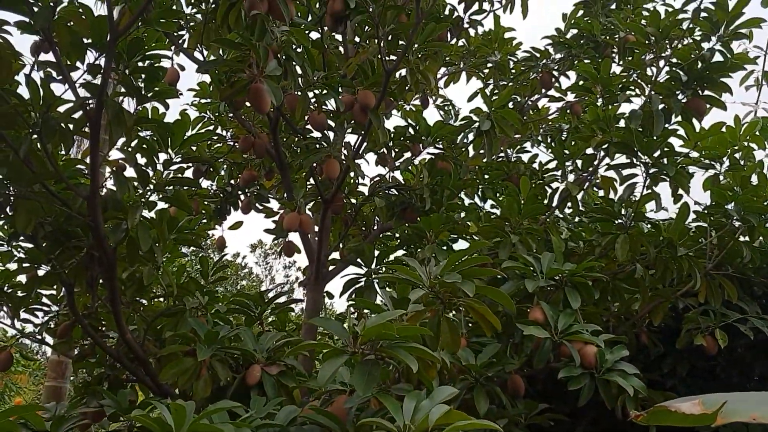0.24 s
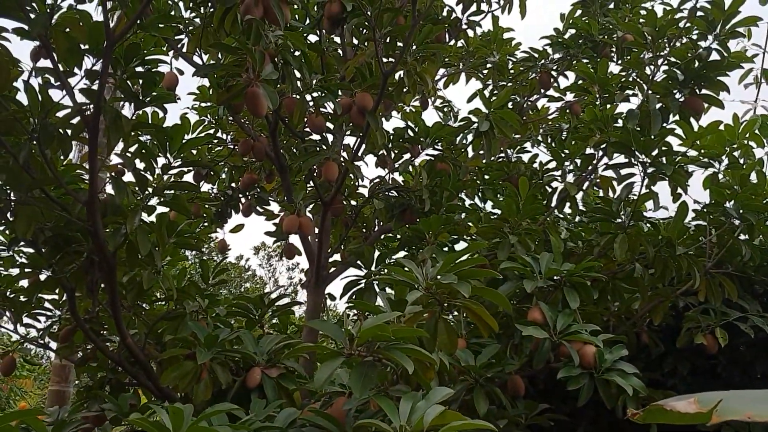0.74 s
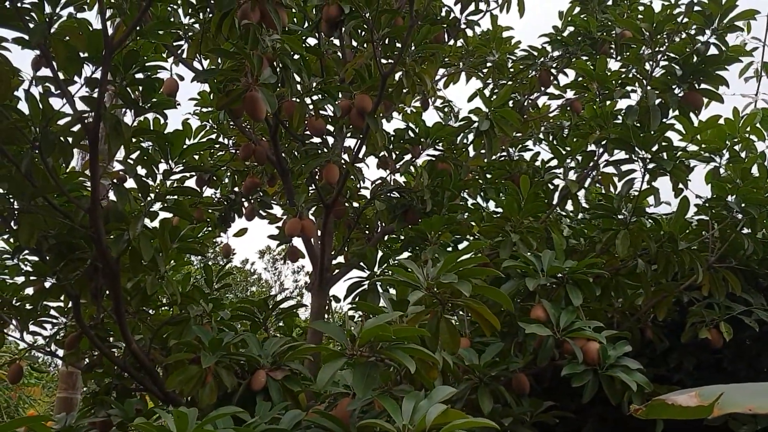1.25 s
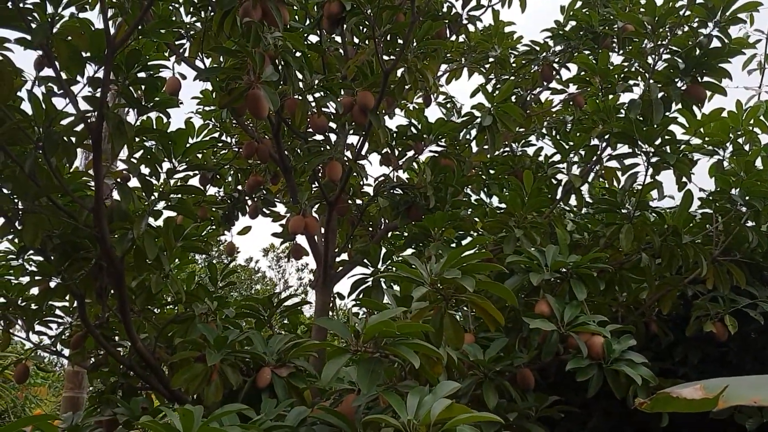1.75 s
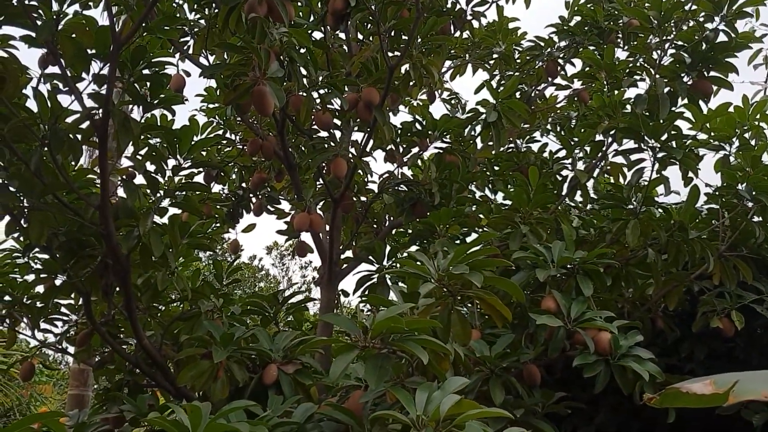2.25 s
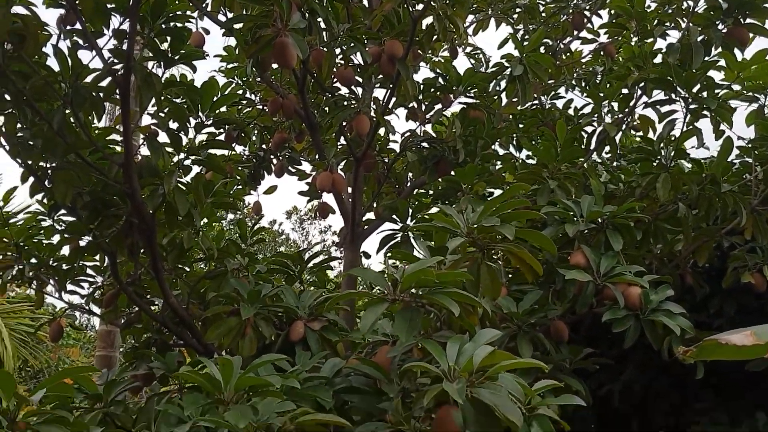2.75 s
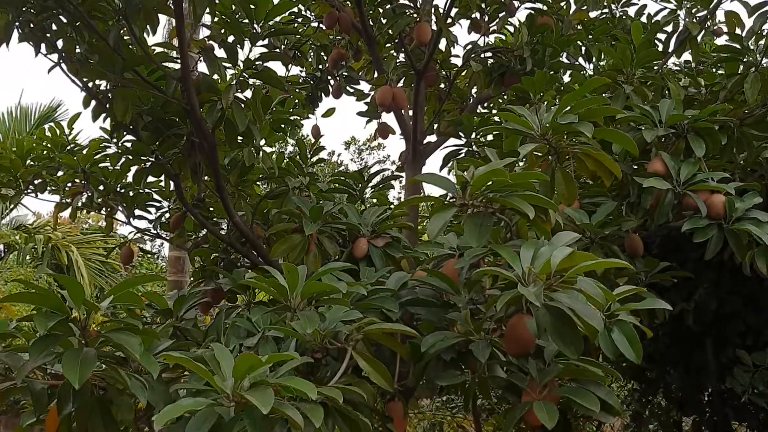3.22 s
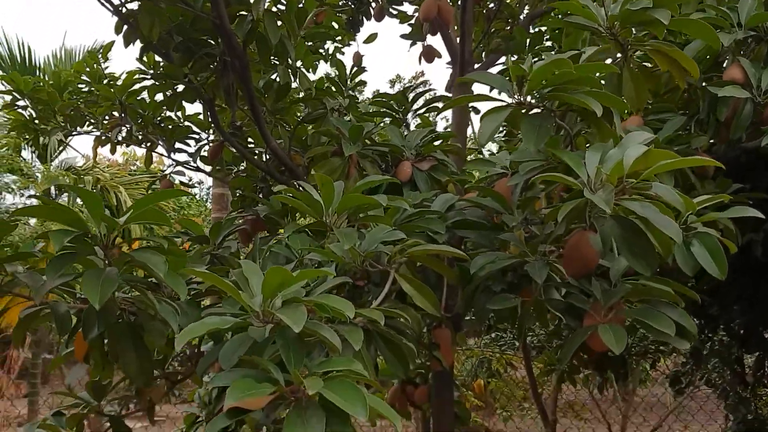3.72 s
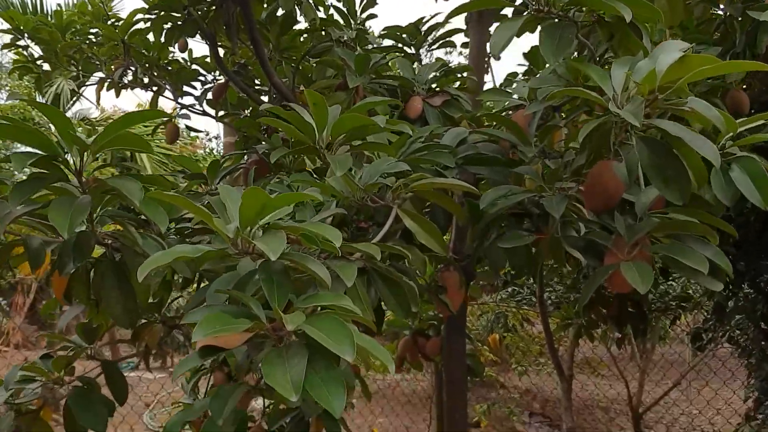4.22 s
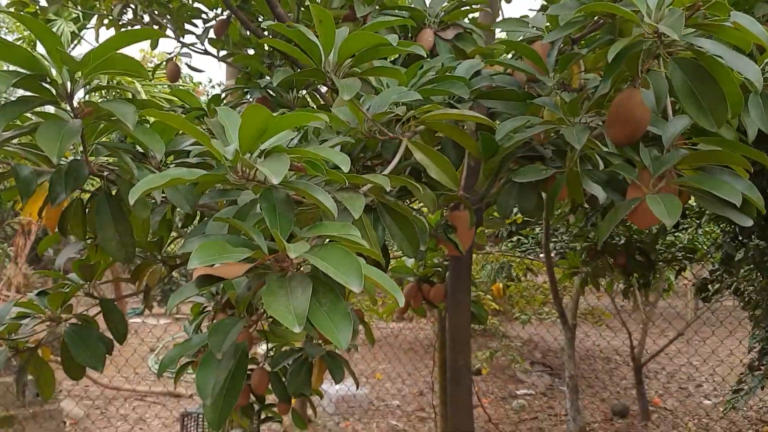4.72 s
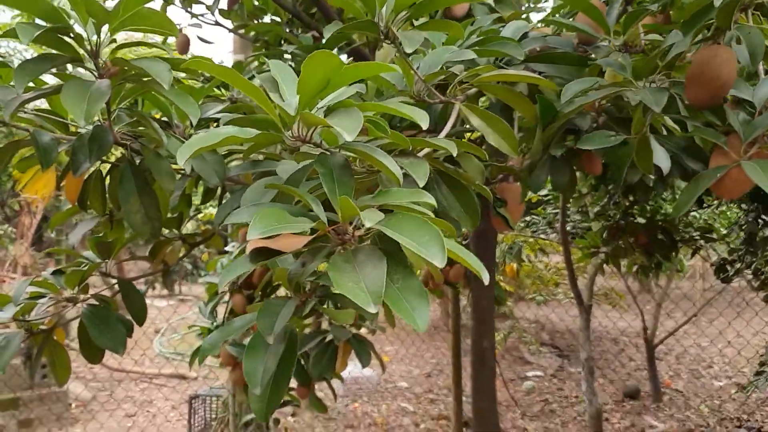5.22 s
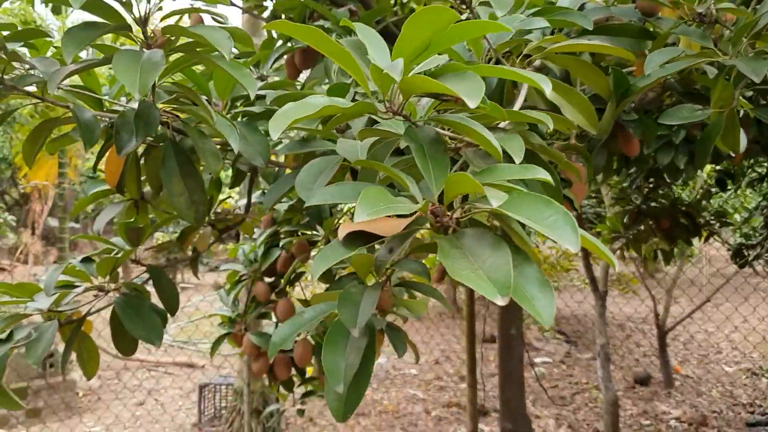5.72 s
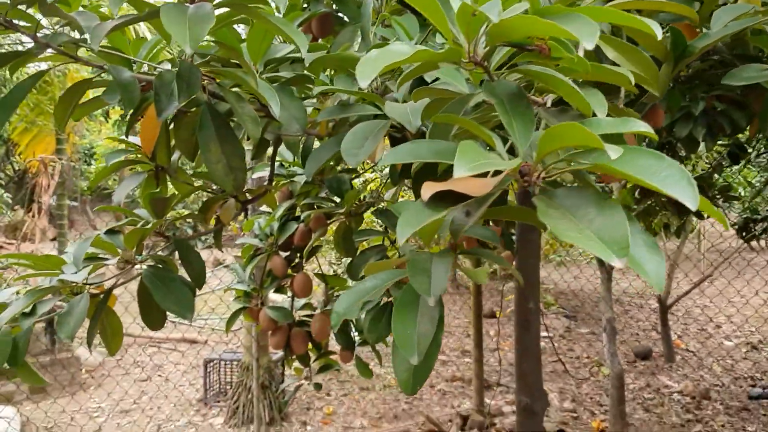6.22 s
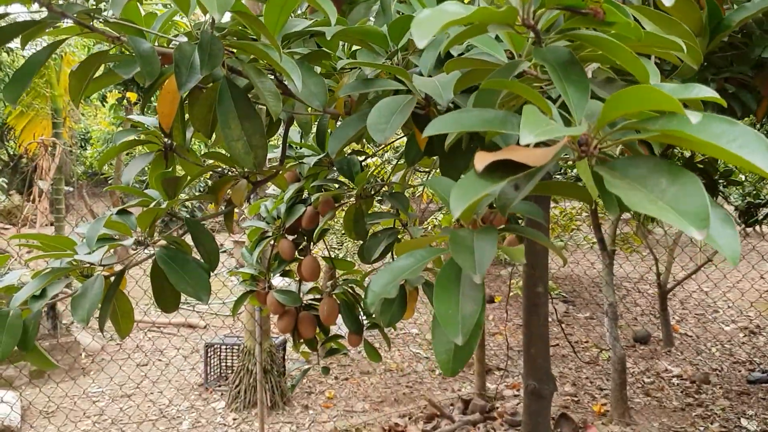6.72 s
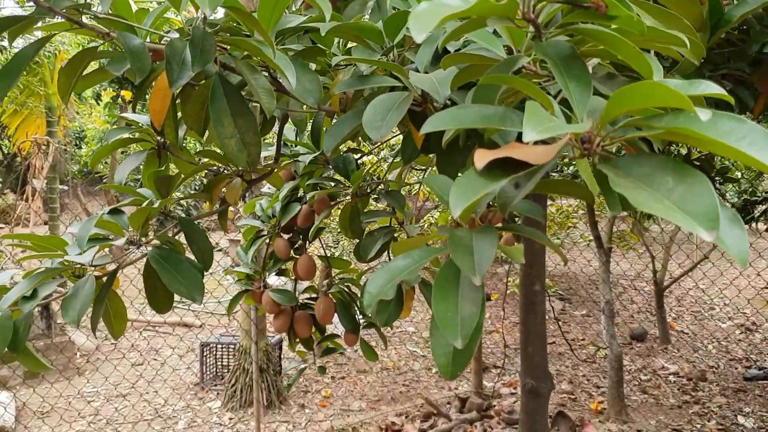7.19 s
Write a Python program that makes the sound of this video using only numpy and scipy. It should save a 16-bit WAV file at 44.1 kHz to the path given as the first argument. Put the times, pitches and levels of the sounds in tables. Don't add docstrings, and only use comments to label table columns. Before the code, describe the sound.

Two hens cluck hoarsely and give drawn-out squawks in an orchard while a songbird repeats a falling whistle over a faint distant pump thump.

```python
import sys
import numpy as np
from scipy import signal
from scipy.fft import rfft, irfft, next_fast_len
from scipy.io import wavfile
from scipy.ndimage import uniform_filter1d

SR = 44100
rng = np.random.default_rng(int(sys.argv[2]) if len(sys.argv) > 2 else 0)


def dump(signal):
    limited = np.clip(np.atleast_2d(signal).T, -1, 1)
    pcm = np.round(limited * 32767).astype(np.int16)
    wavfile.write(sys.argv[1], SR, pcm)


def nominal_scale(level):
    x = np.asarray(level, float) / 20
    return 10 ** x


N = 328711


def shape(hz, points):
    f, db = np.transpose(points)
    return nominal_scale(np.interp(np.log(np.maximum(hz, 1)), np.log(f), db))


def colour(x, points):
    size = next_fast_len(len(x))
    hz = np.arange(size // 2 + 1) * SR / size
    return irfft(rfft(x, size) * shape(hz, points), size)[:len(x)]


def unit(x):
    return x / np.sqrt(np.mean(x ** 2))


def add(out, x, s):
    early, i = max(-int(s * SR), 0), max(int(s * SR), 0)
    out[..., i:i + x.shape[-1] - early] += x[..., early:early + N - i]


def ring(x, hz, width_hz):
    return signal.lfilter(*signal.iirpeak(hz, hz / width_hz, SR), x)


def walk(rate_hz, size=N):
    k = int(SR / rate_hz)
    noise = rng.standard_normal(size + 2 * k)
    return unit(uniform_filter1d(uniform_filter1d(noise, k), k)[k:k + size])


def pulses(hz, jitter, scatter_db, weak):
    cycles = np.cumsum(hz) / SR
    count = int(cycles[-1]) + 2
    chance = rng.standard_normal((count, 2))
    due = np.cumsum(1 + jitter * chance[:, 0]) - 1
    at = np.interp(due, cycles, np.arange(len(hz)), right=len(hz))
    size = nominal_scale(scatter_db * chance[:, 1]) * (1 - weak * (np.arange(count) % 2))
    out, whole = np.zeros(len(hz) + 2), at.astype(int)
    np.add.at(out, whole, size * (1 - at + whole))
    np.add.at(out, whole + 1, size * (at - whole))
    return out[:len(hz)]


def tract(x, modes):
    y = 0
    for k, (hz, width_hz, db) in enumerate(modes):
        y = y + (-1) ** k * nominal_scale(db) * ring(ring(x, hz, width_hz), hz, 1.66 * width_hz)
    return y / abs(y).max()


# (frequency [Hz], level [dB])
AIR_OUTLINE = [(87, -0.5), (195, -27.5), (256, -17.5), (439, -33), (840, -18), (1520, -26.5), (3620, -35),
               (16000, -30)]
AIR_DB = -69


def air():
    noise = np.array([colour(rng.standard_normal(N), AIR_OUTLINE) for _ in range(2)])
    high_pass = signal.butter(2, 150, "high", fs=SR, output="sos")
    return unit(signal.sosfilt(high_pass, noise)) * nominal_scale(AIR_DB + walk(2))


def wind():
    gusts = rng.standard_normal((2, N)) + 0.79 * rng.standard_normal(N)
    band = signal.butter(2, [35, 150], "band", fs=SR, output="sos")
    return unit(signal.sosfilt(band, gusts)) * nominal_scale(np.array([[-59.5], [-57.5]]))


# (time [s], firing rate [1/s])
PUMP_RATE = [(0.0, 14.7), (1.91, 15.7), (2.34, 17.2), (7.45, 17.9)]
# (frequency [Hz], width [Hz], level [dB])
EXHAUST_MODES = [(50.4, 18, -36.5), (89.4, 17, 4.5), (132.3, 7.5, -3.5), (216, 170, -6)]
PUMP_DB = -54.5


def pump():
    rate_hz = np.interp(np.arange(N) / SR, *np.transpose(PUMP_RATE))
    fired = pulses(rate_hz, jitter=.07, scatter_db=2.5, weak=0)
    thump = 0
    for k, (hz, width_hz, db) in enumerate(EXHAUST_MODES):
        thump = thump + (-1) ** k * nominal_scale(db) * unit(ring(ring(fired, hz, width_hz), hz, 3.3 * width_hz))
    thump = signal.sosfilt(signal.butter(4, 280, fs=SR, output="sos"), thump)
    mono = unit(thump) * nominal_scale(PUMP_DB + walk(2))
    return mono * nominal_scale(np.array([[-.8], [.8]]))


# (time [s], level [dB])
BRUSHING = [(3.001, -109), (3.131, -75), (3.2, -62.5), (3.31, -57), (3.38, -64), (4.03, -60), (4.33, -73),
            (4.46, -82), (4.841, -73), (5.64, -81.5), (6.35, -73), (6.5, -62), (6.66, -88.5), (7.019, -103),
            (7.2, -68), (7.45, -64)]
# (frequency [Hz], level [dB])
LEAF_OUTLINE = [(470, -67.5), (800, -19.5), (1850, -11.5), (2290, -10), (3300, -8.5), (4460, -14.5),
                (9940, -14.5), (16000, -15)]


def rustle():
    s, db = np.transpose(BRUSHING)
    grain_db = 6.5 * np.minimum(rng.exponential(size=N), 3.5)
    grains = rng.standard_normal((2, N)) * (1 + (rng.random(N) < .006) * nominal_scale(grain_db))
    hiss = np.array([unit(colour(g, LEAF_OUTLINE)) for g in grains]) * nominal_scale(np.array([[2.5], [-2.5]]))
    brushed_db = np.interp(np.arange(N) / SR, s, db, left=-110)
    return hiss * nominal_scale(brushed_db + 10.5 + 0.6 * walk(26))


# (time [s], level [dB], frequency [Hz], left minus right [dB])
LEAF_TICKS = [(3.3433, -35.5, 10900, -4), (3.6795, -28.5, 14360, 6), (3.7229, -42, 9560, 0),
              (3.7618, -37, 13300, 3.5), (3.8646, -30, 8400, 6), (3.9894, -31.5, 8930, 12),
              (4.0512, -14, 9500, 13.5), (4.142, -26.5, 13480, 2), (4.6992, -42, 8940, -2),
              (4.8534, -39.5, 11500, -4), (5.027, -68, 9600, 0)]
LEAF_TAPS = [
    (4.67, -59, 948, -17),
    (4.964, -42, 810, -1),
    (5.002, -42, 881, 1),
    (5.066, -39, 1940, 6.5),
    (5.199, -56.5, 2100, 3),
    (6.747, -51.5, 904, 4),
]


def ticks_and_taps():
    out, t = np.zeros((2, N)), np.arange(int(0.028 * SR)) / SR
    decay = np.exp(-t / .003) + 0.27 * np.exp(-t / 0.037)
    for events, breadth in ((LEAF_TICKS, .9), (LEAF_TAPS, .75)):
        for s, db, hz, pan_db in events:
            burst = rng.standard_normal((2, len(t))) * decay
            tick = ring(ring(burst, hz, breadth * hz), hz, 1.3 * breadth * hz)
            add(out, tick / abs(tick).max() * nominal_scale(db + np.array([[pan_db], [-pan_db]]) / 2), s)
    return out


# (time [s], level [dB], left minus right [dB])
KNOCKS = [
    (1.518, -14.5, 26),
    (1.627, -23.5, 15),
    (6.906, -56.5, 10),
]


def knocks():
    out, t = np.zeros((2, N)), np.arange(int(0.028 * SR)) / SR
    jolt = np.exp(-t / 0.00083) - 0.41 * np.exp(-t / 0.006) * np.sin(2 * np.pi * 95 * t)
    for s, db, pan_db in KNOCKS:
        add(out, jolt * nominal_scale(db + np.array([[0], [-pan_db]])), s)
    return out


# (frequency [Hz], left minus right [dB])
PORT_SHADE = [(60, -2), (250, 3.5), (1000, 6), (4000, 9), (15000, 8)]
# (delay [s], t60 [s], level [dB], treble edge [Hz])
NEAR_ECHOES = [(.002, 0.37, 2.5, 6170), (0.018, 0.6, -14.5, 4280), (.06, 1.6, -31.5, 2500),
               (.33, 0.33, -41, 2500)]
DISTANT_ECHOES = [(.001, .35, 1.5, 9000), (0.035, 1.092, -8.5, 4690)]
LEFT_LEAD_S = .00037
ECHOES_ALIKE = 0.38


def orchard(x, direct_db, wet_db, echoes=NEAR_ECHOES):
    lead = round(LEFT_LEAD_S * SR)
    lift = [(f, db / 2) for f, db in PORT_SHADE]
    cut = [(f, -db / 2) for f, db in PORT_SHADE]
    direct = nominal_scale(direct_db) * np.array([colour(x, lift), colour(np.roll(x, lead), cut)])
    t, tail = np.arange(int(1.3 * SR)) / SR, 0
    for delay_s, t60_s, db, edge_hz in echoes:
        noise = signal.lfilter(*signal.butter(1, edge_hz, fs=SR), rng.standard_normal((2, len(t))))
        noise[1] = ECHOES_ALIKE * np.roll(noise[0], lead) + np.sqrt(1 - ECHOES_ALIKE ** 2) * noise[1]
        fading = noise * (t > delay_s) * nominal_scale(-60 * t / t60_s)
        tail = tail + nominal_scale(db) * fading / np.sqrt(np.sum(fading ** 2) / 2)
    tail = np.array([tail[0], colour(tail[1], cut)])
    return direct + nominal_scale(wet_db) * signal.fftconvolve(x[None], tail, axes=1)[:, :N]


# (time [s], length [s], start [Hz], end [Hz], level [dB])
FAR_NOTES = [
    (0.609, 0.015, 5220, 2500, -61),
    (2.631, 0.11, 2470, 1973, -59.5),
    (2.757, 0.062, 2210, 2580, -64),
    (2.786, 0.057, 2850, 3190, -76),
    (2.85, 0.058, 2000, 2500, -69),
    (2.919, 0.011, 3280, 2250, -60),
    (3.038, 0.055, 5200, 5943, -64),
    (3.108, 0.055, 5990, 6900, -55),
    (4.58, 0.11, 3370, 2900, -67),
    (5.037, .12, 2700, 2195, -64.5),
]
# (time into it [s], length [s], start [Hz], end [Hz], level [dB])
PHRASE_NOTES = [
    (0, 0.091, 6670, 4755, -61),
    (.097, 0.043, 5100, 6100, -66),
    (.15, .055, 5620, 7300, -69),
]
CHIP_NOTES = [
    (0.0043, 0.016, 6900, 4230, -52),
]
PHRASE_STARTS_S = [.939, 2.635, 5.748]
CHIP_STARTS_S = [2.92, 4.652, 5.305]
FAR_BLUR_HZ = 350


def twitter():
    out, notes = np.zeros(N), list(FAR_NOTES)
    for motif, starts in ((PHRASE_NOTES, PHRASE_STARTS_S), (CHIP_NOTES, CHIP_STARTS_S)):
        notes += [(start + s, *note) for start in starts for s, *note in motif]
    for s, length_s, start_hz, end_hz, db in notes:
        count = int(length_s * SR)
        hz = np.linspace(start_hz, end_hz, count)
        frayed = np.hanning(count) ** 0.069 * (0.37 + walk(FAR_BLUR_HZ, size=count))
        add(out, nominal_scale(db) * frayed * np.sin(2 * np.pi * np.cumsum(hz) / SR), s)
    return out


# (time [s], peak level [dB], start [Hz])
FALLING_WHISTLES = [
    (1.332, -36.5, 6380),
    (2.293, -36.5, 6250),
    (3.58, -36.5, 6030),
    (4.78, -36.5, 6120),
    (5.968, -35.5, 6100),
    (7.107, -34.5, 6110),
]
WHISTLE_END_HZ, WHISTLE_S = 2490, .185


def whistles():
    out, t = np.zeros(N), np.arange(int(WHISTLE_S * SR)) / SR
    fall = 0.67 * np.exp(-(t / 0.029) ** 1.2) + .33 * (1 - t / WHISTLE_S) ** .8
    edge = np.clip(np.minimum(t / 0.025, (WHISTLE_S - t) / 0.042), 0, 1)
    for s, db, start_hz in FALLING_WHISTLES:
        hz = WHISTLE_END_HZ + (start_hz - WHISTLE_END_HZ) * fall
        loud = nominal_scale(db - 98 * t + 2 * walk(58, size=len(t))) * edge
        add(out, np.sqrt(2) * loud * np.sin(2 * np.pi * np.cumsum(hz) / SR), s)
    return out


THROAT_WIDTH_HZ = 458
UNEVEN, AIRY = .12, .6


def clucks(calls, rough, bill, neck_hz, neck_db, crop_hz, crop_db, open_s):
    out, t = np.zeros(N), np.arange(int(.25 * SR)) / SR
    usual_hz = np.mean([call[2] for call in calls])
    opening = 1 - np.exp(-(t / open_s) ** 2)
    for s, db, throat_hz, beak_db, length_s in calls:
        hz = throat_hz / 2 * (1 - .3 * np.exp(-1.7 * t / open_s))
        buzz = unit(pulses(hz, UNEVEN * rough, 6 * rough, 0.51 * rough))
        source = buzz + AIRY * rough * rng.standard_normal(len(t))
        source = source / (1 + np.exp((t - length_s) / .011))
        throat_modes = [(throat_hz, THROAT_WIDTH_HZ, .1), (neck_hz, 200, neck_db)]
        beak_modes = [(f * throat_hz / usual_hz, width_hz, g) for f, width_hz, g in bill]
        throat = tract(source * opening ** 2, throat_modes)
        crop = tract(source * opening * np.exp(-t / 0.045), [(crop_hz, 140, .1)])
        beak = tract(source * opening ** 7, beak_modes)
        call = throat + nominal_scale(crop_db) * crop + nominal_scale(beak_db + 3.5) * beak
        add(out, nominal_scale(db) * call, s - .6 * open_s)
    return out


def at_low_squawks(sound, shift_s, end):
    return [(call[end][0] + shift_s, *sound) for call in LOW_SQUAWKS]


# (time [s], peak level [dB], throat [Hz], beak against throat [dB], length [s])
DEEP_CALLS = [(-.045, -27, 715, -10, 0.067), (1.291, -27.5, 709, -6.5, 0.06),
              (1.767, -27, 797.5, -12, 0.057), (2.255, -33, 699.6, -5, 0.04),
              (3.268, -30, 677.6, -12.5, 0.053), (3.484, -29.5, 702.3, -10.5, 0.053),
              (3.704, -31, 667, -24, 0.087), (5.367, -29, 762, -14.5, 0.056),
              (5.609, -29.5, 761, -13.5, 0.068), (5.837, -29, 659, -12, 0.033),
              (6.067, -25, 756.4, -12.5, 0.074)]
# (peak level [dB], throat [Hz], beak against throat [dB], length [s])
GRUNT_SOUND = (-38, 711, -10, 0.03)
# (frequency [Hz], width [Hz], level [dB])
DEEP_BILL = [(1110, 270, -8), (1380, 620, -8), (1790, 144, 7.5), (2420, 425, -5.5), (4680, 1600, -13),
             (9500, 8000, -33)]
DEEP_ROUGH, GRUNT_S = .52, .035


def deep_clucks():
    calls = DEEP_CALLS + at_low_squawks(GRUNT_SOUND, GRUNT_S, end=-1)
    return clucks(calls, DEEP_ROUGH, DEEP_BILL, neck_hz=850, neck_db=-14, crop_hz=277, crop_db=-12.5,
                  open_s=.024)


# (time [s], peak level [dB], throat [Hz], beak against throat [dB], length [s])
SHARP_CALLS = [(.212, -27, 925.6, -9, 0.06), (1.532, -18, 942, -6.5, 0.014),
               (1.812, -23, 912, -4.5, 0.0086), (2.49, -26.5, 945, -6.5, 0.018),
               (3.642, -23.5, 935, -5, 0.024), (3.852, -19, 968, -6.5, 0.037), (4.094, -28, 915, -1, 0.052),
               (5.856, -27, 877.6, -8, 0.037), (6.325, -21.5, 933.3, -12, 0.034),
               (6.925, -29, 936, -5, 0.051), (7.131, -26.5, 944, -6.5, 0.048)]
VOICE_CRACKS = [
    (3.925, -16, 1289, -2.5, 0.038),
    (7.217, -22, 1186, -1, 0.043),
    (7.408, -28, 1258, -23, 0.018),
]
# (peak level [dB], throat [Hz], beak against throat [dB], length [s])
OPENING_SOUND = (-29, 914, -5, 0.16)
CLOSING_SOUND = (-28.5, 919.5, -1.5, 0.02)
# (frequency [Hz], width [Hz], level [dB])
SHARP_BILL = [(1495, 288, 5.5), (1898, 457, -2.5), (2500, 500, -3.5), (4630, 1730, -14), (9500, 6000, -30)]
SHARP_ROUGH, CRACK_ROUGH = .45, .8
OPENS_S, CLOSES_S = -.003, -.014


def sharp_clucks():
    calls = SHARP_CALLS + at_low_squawks(OPENING_SOUND, OPENS_S, end=0)
    closes = at_low_squawks(CLOSING_SOUND, CLOSES_S, end=-1)
    sharp = clucks(calls, SHARP_ROUGH, SHARP_BILL, neck_hz=690, neck_db=-3, crop_hz=484, crop_db=-16,
                   open_s=.016)
    closing = clucks(closes, CRACK_ROUGH, SHARP_BILL, neck_hz=710, neck_db=-4.5, crop_hz=470, crop_db=-13.5,
                     open_s=.016)
    cracks = clucks(VOICE_CRACKS, CRACK_ROUGH, SHARP_BILL, neck_hz=704, neck_db=0, crop_hz=400,
                    crop_db=-23.5, open_s=.015)
    return sharp + closing + cracks


STRONG_PARTIALS = (1, 2, 4)


def squawks(calls, voices, partials, beak, tremble, breath_db):
    out = np.zeros(N)
    for call, (half, first_db, fourth_db) in zip(calls, voices):
        s, *columns = np.transpose(call)
        t = np.arange(s[0], s[-1], 1 / SR)
        size = len(t)
        hz, effort_db, open_db = (np.interp(t, s, c) for c in columns)
        *strong_db, top_db = (effort_db + db + share * open_db for db, share in partials)
        strong_db[0] = strong_db[0] + first_db
        strong_db[-1] = strong_db[-1] + fourth_db
        phase = 2 * np.pi * np.cumsum(hz * (1 + tremble * walk(360, size=size))) / SR
        low, top = 0, 0
        for k in np.arange(.5, 15500 / hz.max(), .5):
            waver = nominal_scale(0.51 * min(k + 3, 11) * walk(27, size=size))
            line = shape(k * hz, beak) * np.sin(k * phase + 6 * rng.random()) * waver
            if k % 1:
                line = line * half
            if k in STRONG_PARTIALS:
                level_db = strong_db[STRONG_PARTIALS.index(k)] + 2 * walk(27, size=size)
                low = low + np.sqrt(2) * nominal_scale(level_db) * np.sin(k * phase)
            elif k < STRONG_PARTIALS[-1]:
                low = low + line * nominal_scale(np.mean(strong_db, axis=0) + 1.5)
            else:
                top = top + line
        breath = unit(colour(np.diff(rng.standard_normal(size + 1)), beak)) * nominal_scale(top_db + breath_db)
        top = np.clip((t - s[0]) / .04, .2, 1) * unit(top) * nominal_scale(top_db + 0.5)
        edge = np.clip(np.minimum(t - s[0], s[-1] - t) / 0.0069, 0, 1)
        add(out, edge * (low + top + breath), s[0])
    return out


# (time [s], pitch [Hz], effort [dB], beak opening [dB])
HIGH_SQUAWKS = [
    [(3.94, 830.6, -32, 1), (3.968, 773.2, -22, 4.5), (4.005, 764, -25.5, 5), (4.04, 733, -33.5, 17),
     (4.09, 736, -34, 12.5), (4.12, 690, -30.5, 2.5)],
    [(7.248, 805, -36, 11), (7.276, 761, -30.5, 1.5), (7.324, 735, -36, 2), (7.356, 733, -29.5, 5),
     (7.41, 721.1, -26.5, -6.5), (7.435, 741, -45, -5)],
]
# (half-pitch lines [0-1], first partial lift [dB], fourth partial lift [dB])
HIGH_VOICES = [
    (.02, -1, -3),
    (.02, -.1, 6.5),
]
# (level above effort [dB], share of beak opening [0-1])
HIGH_MIX = [(0.4, .01), (2, 0.93), (-14, 0.77), (-13.5, 0.49)]
# (frequency [Hz], level [dB])
HIGH_OUTLINE = [(370, -8.5), (1100, -8.5), (2200, -10), (2950, -6.5), (3700, -12.5), (5200, -16),
                (7000, -25.5), (15500, -45)]


def high_hen():
    return squawks(HIGH_SQUAWKS, HIGH_VOICES, HIGH_MIX, HIGH_OUTLINE, tremble=0.0067, breath_db=-2.5)


# (time [s], pitch [Hz], effort [dB], beak opening [dB])
LOW_SQUAWKS = [
    [(.085, 419.3, -36, 12), (.125, 468.5, -28, -12), (.185, 459, -39, -3), (.245, 460.6, -29.5, 1.5),
     (.3, 462, -33.5, -2), (.345, 475.2, -31, -6), (.364, 475, -34, 5)],
    [(1.922, 429.4, -28.5, -3.5), (1.955, 475.2, -29, -8), (2.02, 460, -28.5, -6.5),
     (2.076, 461.7, -29, -1.5), (2.15, 468, -26, -12), (2.208, 475, -29.5, 0.5)],
    [(4.056, 484.4, -38, -4), (4.1, 464.2, -33.5, 0.5), (4.165, 456, -35, 13), (4.23, 463, -33.5, 4.5),
     (4.29, 476, -27.5, -7.5), (4.33, 473, -31.5, 4)],
    [(6.232, 429.8, -39.5, 11), (6.28, 475.7, -28, -8), (6.325, 463.2, -33.5, 3), (6.388, 451, -33.5, 6.5),
     (6.46, 469.3, -29, -10.5), (6.53, 473.5, -28, -8.5)],
]
# (half-pitch lines [0-1], first partial lift [dB], fourth partial lift [dB])
LOW_VOICES = [
    (0.58, -1, 1.05),
    (0.2, -7, 1.1),
    (0.15, -0.5, .1),
    (0.18, 3, 1.39),
]
# (level above effort [dB], share of beak opening [0-1])
LOW_MIX = [(-17.5, .05), (0, 0), (-1.5, 1), (-11, 0.33)]
# (frequency [Hz], level [dB])
LOW_OUTLINE = [(230, -24), (700, 2), (1150, -7.5), (1500, 5.5), (2300, -4), (3500, -19), (5000, -14),
               (15500, -43.5)]


def low_hen():
    return squawks(LOW_SQUAWKS, LOW_VOICES, LOW_MIX, LOW_OUTLINE, tremble=0.0044, breath_db=-9.5)


def scene():
    background = air() + wind() + pump()
    handling = rustle() + ticks_and_taps() + knocks()
    birds = orchard(twitter(), direct_db=-12, wet_db=-0.085, echoes=DISTANT_ECHOES)
    birds = birds + orchard(whistles(), direct_db=0.36, wet_db=-0.39)
    hens = orchard(deep_clucks(), direct_db=4.6, wet_db=1.6)
    hens = hens + orchard(sharp_clucks(), direct_db=4.3, wet_db=-2.56)
    hens = hens + orchard(high_hen() + low_hen(), direct_db=1.39, wet_db=-7.5)
    return background + handling + birds + hens


def band_limit(x):
    return signal.sosfilt(signal.butter(12, 16500, fs=SR, output="sos"), x)


def record(dry):
    rounded = np.tanh(dry)
    top_cut = signal.ellip(8, .2, 60, 15700, fs=SR, output="sos")
    return band_limit(signal.sosfilt(top_cut, rounded))


dry = scene()
out = record(dry)
dump(out)
```